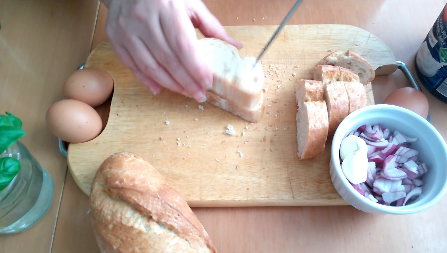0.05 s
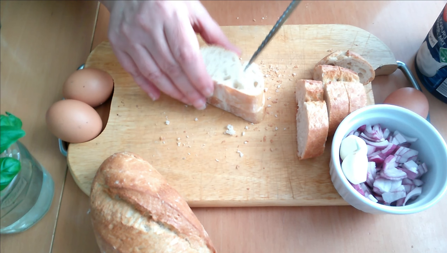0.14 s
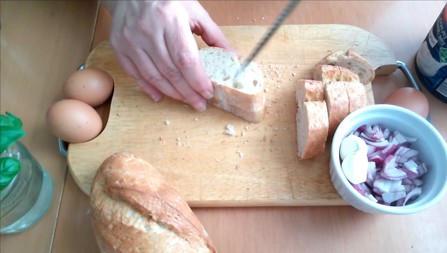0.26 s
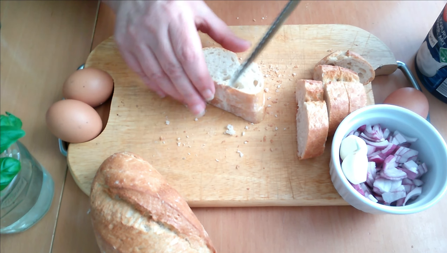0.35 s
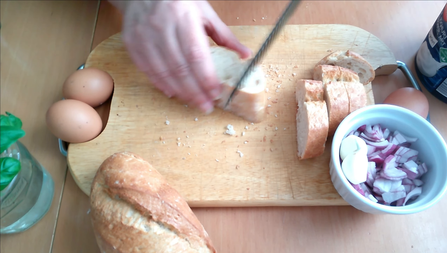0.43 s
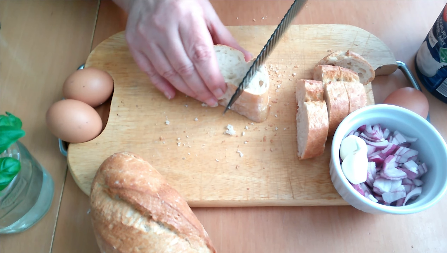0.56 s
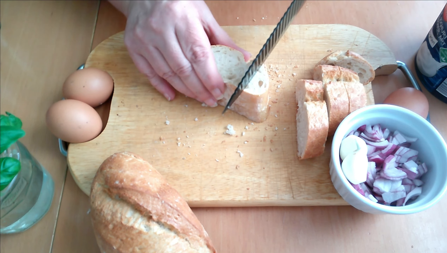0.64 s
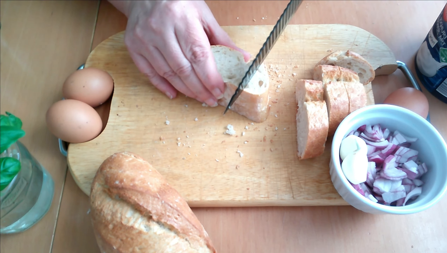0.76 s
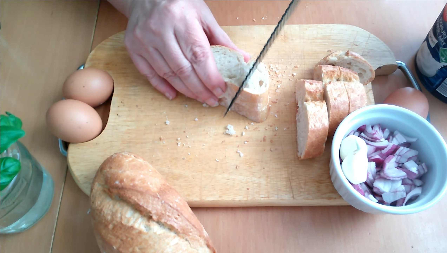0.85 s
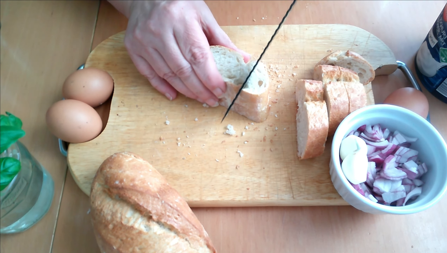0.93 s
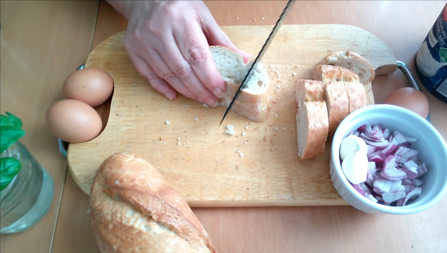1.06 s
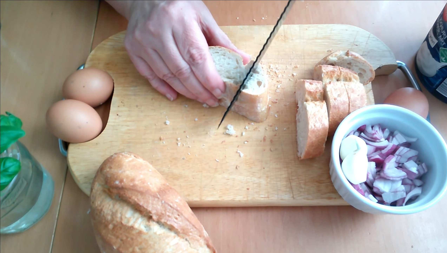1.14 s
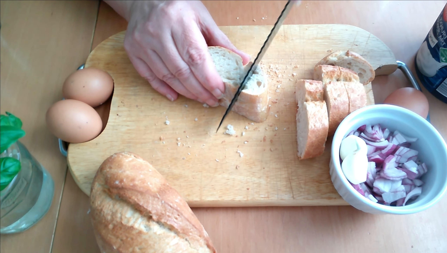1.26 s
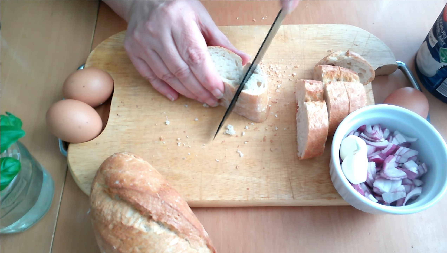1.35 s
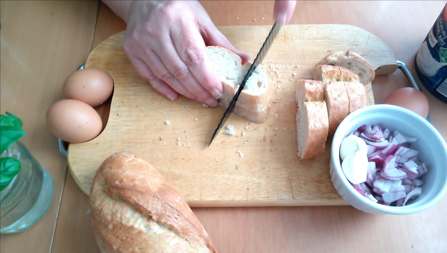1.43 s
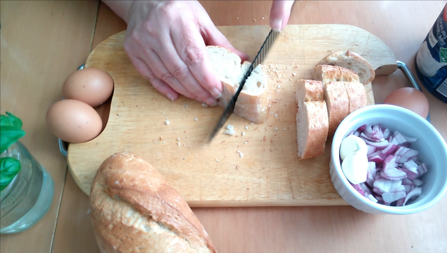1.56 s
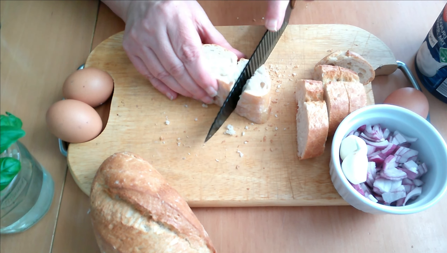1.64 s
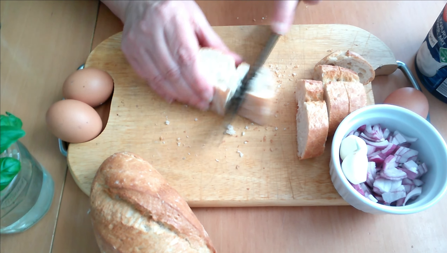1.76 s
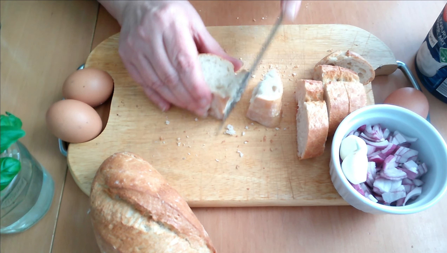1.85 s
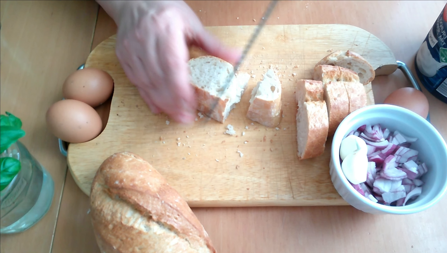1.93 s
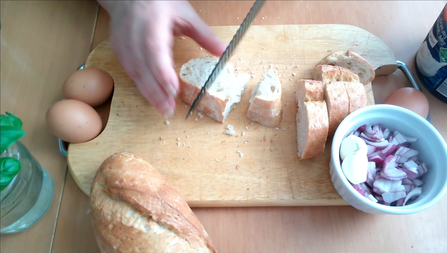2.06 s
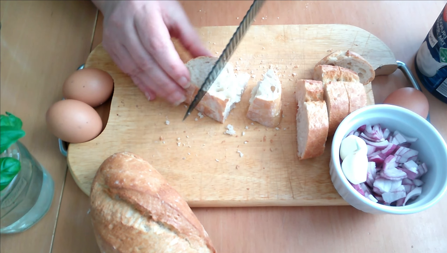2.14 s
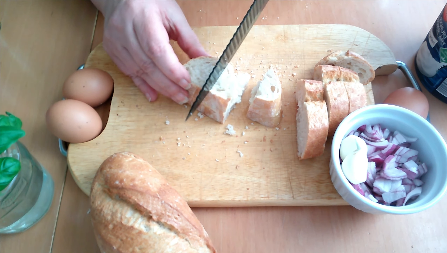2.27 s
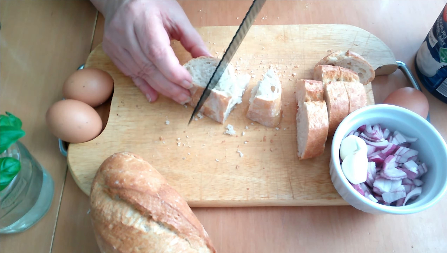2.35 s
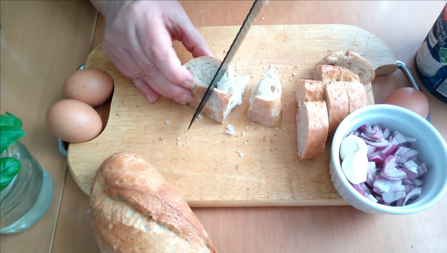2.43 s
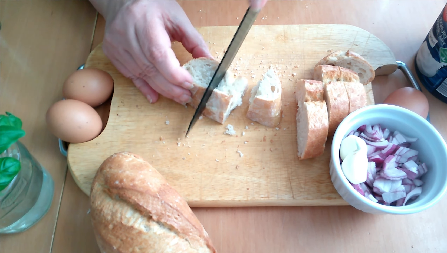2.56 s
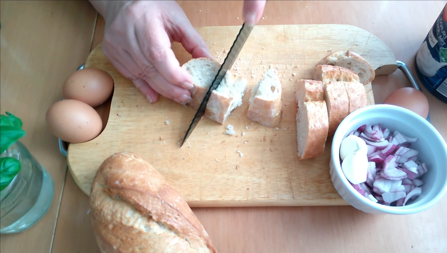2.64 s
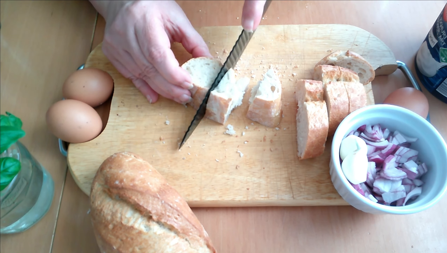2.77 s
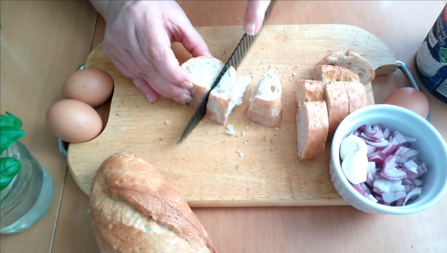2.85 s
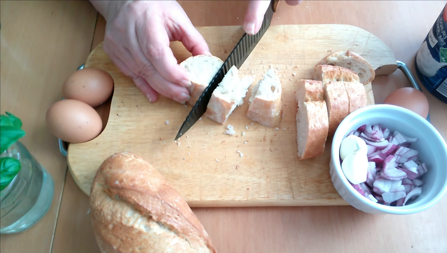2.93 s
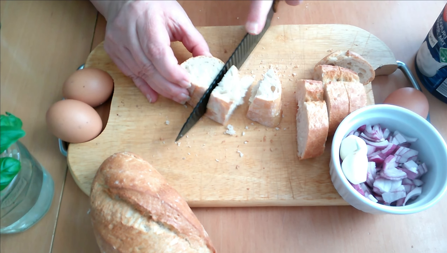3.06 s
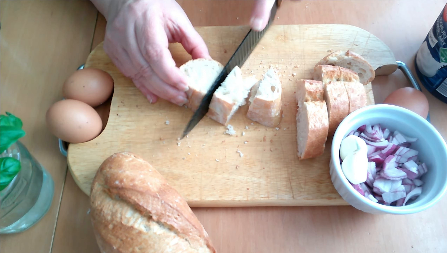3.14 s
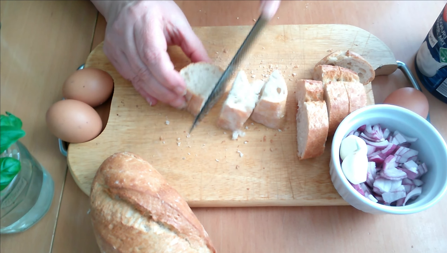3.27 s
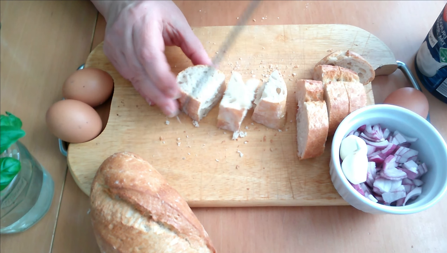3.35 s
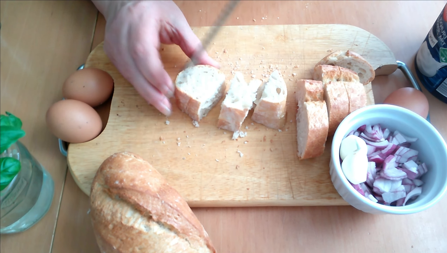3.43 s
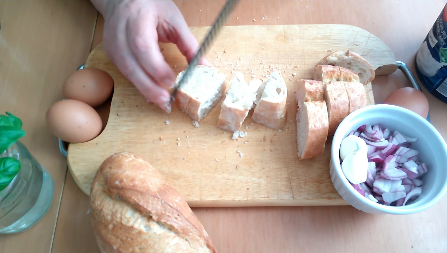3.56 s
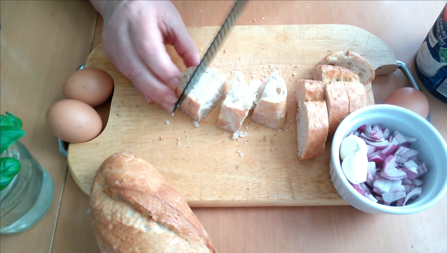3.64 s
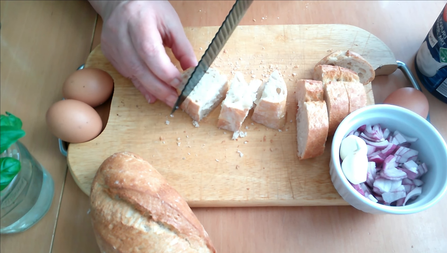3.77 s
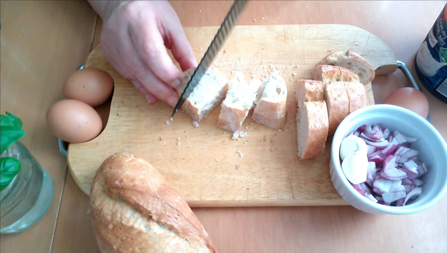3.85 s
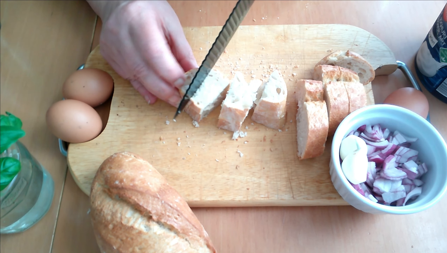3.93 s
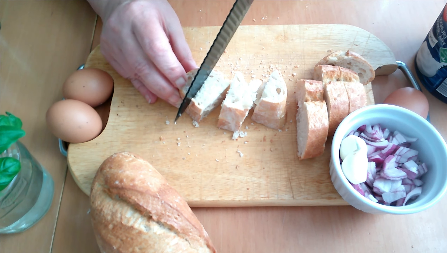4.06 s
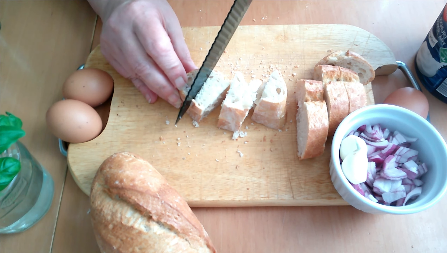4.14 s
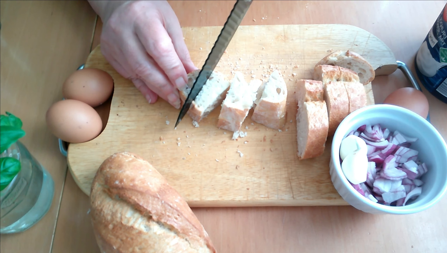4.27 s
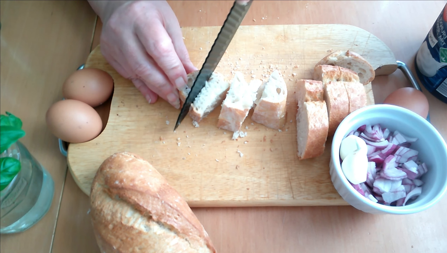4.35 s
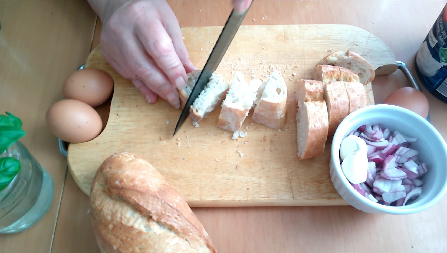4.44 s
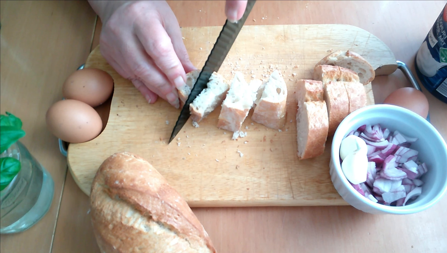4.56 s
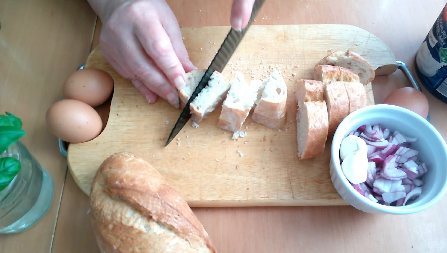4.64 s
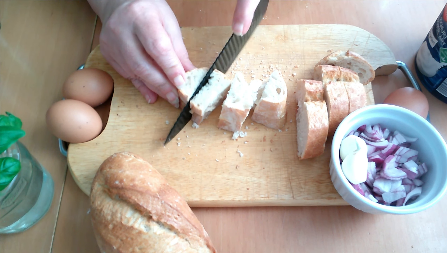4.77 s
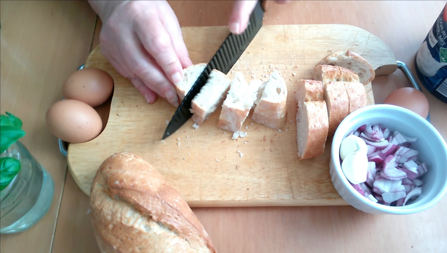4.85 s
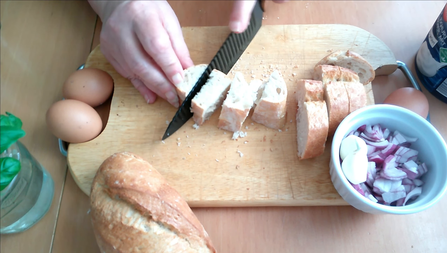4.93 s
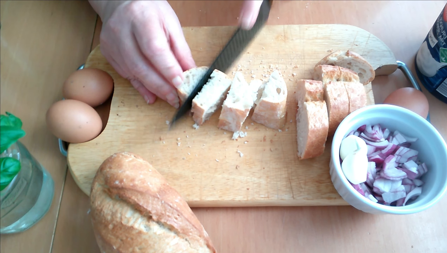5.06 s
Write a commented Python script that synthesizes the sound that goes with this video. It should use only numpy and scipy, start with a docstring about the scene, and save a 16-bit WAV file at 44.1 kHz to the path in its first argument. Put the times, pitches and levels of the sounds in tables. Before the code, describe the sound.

In a home kitchen, a serrated knife saws three slices off a crusty loaf. The teeth rasp and the crust crackles, and the blade knocks hard on the wooden board twice in the first half. After a short lull the sawing picks up again and ends around a lighter double knock. The microphone is close, with a low table rumble under the strokes and a faint room hum.

```python
"""A serrated knife saws three slices off a crusty loaf on a wooden board.
First the kitchen hums, a far engine speeds up until 1.2 s, and the blade taps the board.
From 0.4 s the teeth rasp and crack the crust; hands and saw sway the table in its low modes.
Hard knocks on the board come at 1.4 and 2.6 s; between them the blade sings faintly as it slides out.
After a lull the sawing picks up at 4.2 s and ends around a double knock near 5 s."""
import sys
import numpy as np
from scipy import signal
from scipy.io import wavfile
from scipy.ndimage import uniform_filter1d

SR = 44100
rng = np.random.default_rng(int(sys.argv[2]) if len(sys.argv) > 2 else 0)


def transcribe(signal):
    """Save signal, clipped to [-1, 1], as a 16-bit WAV file at the path in sys.argv[1]."""
    frames = np.atleast_2d(signal).T
    limited = np.clip(frames, -1, 1)
    pcm = np.round(limited * 32767).astype(np.int16)
    wavfile.write(sys.argv[1], SR, pcm)


N = 224818

# room noise spectrum: freq_hz, relative_db
HUM_SPECTRUM = [(40, 5.5), (100, -1.5), (200, -7.5), (300, -10.5), (450, -15.5), (1000, -18.5),
                (2000, -25.5), (3000, -33), (3800, -41.5), (4800, -55.5), (6500, -46.5), (8500, -48),
                (11000, -61.5), (13500, -66), (16000, -79)]
# far engine: time_s, firing_hz, level_db
ENGINE_RUN = [(0, 63.6, -54.5), (.15, 68.67, -58), (.4, 73.5, -54.5), (.6, 81.5, -51), (.8, 85.4, -45),
              (.95, 86.7, -50), (1.2, 88.8, -63)]
# engine orders: firing_multiple, gain_db
ENGINE_ORDERS = [(2, 2.5), (3, -5)]
# table modes: pitch_hz, gain_db, t60_s
TABLE_MODES = [(30, -3, .7), (64, 0, .5), (101, -3, .3), (143, -6, .2), (206, -9, .15), (266, -13, .7)]
# hands rocking the lowest table mode: time_s, level_db
HAND_LEAN = [(0.0, -60), (0.67, -47), (0.81, -51), (0.88, -29), (1.33, -38.5), (1.56, -28), (1.94, -47),
             (2.62, -40), (2.78, -30.5), (2.99, -39), (3.06, -30), (3.27, -53), (3.83, -36), (3.98, -48),
             (4.44, -37), (4.61, -25), (4.88, -29.5), (5.09, -48)]
# saw driving the next two table modes: gain_db, shake_exponent, linger_s
SHAKE_COUPLING = [(-20, 0.53, 0.066), (-10, .75, 0.017)]
# blade on board: start_s, peak_db, centre_hz, tick_peak_db, thump_db
KNOCKS = [(0.0508, -27, 1230, -54, -43), (0.159, -37, 900, -52, -57), (1.3721, 1.5, 1090, -19, -25),
          (2.088, -34.5, 1400, -62, -36.5), (2.5863, 0, 1000, -36, -24.5), (3.614, -22.5, 1410, -52, -34.5),
          (3.874, -44, 994, -58, -46), (4.9577, -12.5, 704, -34, -28.5), (4.9793, -14, 675, -41, -39)]
# board modes: pitch_hz, gain_db, t60_s
BOARD_MODES = [(456, -3.5, 0.052), (667, -6, 0.015), (753.5, -2.5, 0.047), (1069, 8, 0.013),
               (1174, -7, 0.021), (1470, -8, 0.024), (1930, -5.5, 0.045), (2085, -1.5, 0.023),
               (2770, 10, 0.0081), (3900, -4.5, 0.008), (4330, -10.5, 0.005), (6010, -18.5, 0.0053)]
# blade modes: pitch_hz, width_hz, gain_db
BLADE_MODES = [(2100, 180, -13), (2800, 120, -24), (3320, 170, -11), (4500, 50, -34), (6400, 250, -36),
               (12800, 200, -38)]
# treble of snaps and ticks: freq_hz, relative_db
FIZZ_SPECTRUM = [(2650, -37), (4500, -4.5), (6030, -3), (6500, -1.5), (7620, -1), (9430, -7.5),
                 (11100, -22), (12800, -9.5), (14400, -10), (15400, -17.5), (16100, -29.5)]
# body of the crust: freq_hz, relative_db
CRUST_SPECTRUM = [(90, -30.5), (140, 2), (270, -3.5), (320, -15), (420, -6), (600, -6), (1100, -4.5),
                  (1500, -8.5), (2100, -9.5), (2650, -18), (3300, -21.5), (4000, -28), (5000, -43),
                  (7000, -84)]
# saw strokes: start_s, length_s, rasp_start_db, rasp_end_db, treble_rel_db, steel_rel_db, shake_rel_db
STROKES = [(0.412, 0.057, -44, -47, -32, -15, -3.5), (0.746, 0.04, -45, -55.5, -32, -13, 11),
           (0.824, 0.073, -48, -42, -23.5, -35, 15), (.94, 0.27, -41, -53, -25.5, -20, 5.5),
           (1.191, 0.19, -38, -28, -29, -17, 0), (1.403, 0.15, -35.5, -33.5, -25.5, -9.5, -1.5),
           (1.609, 0.066, -46, -47, -24, -14, -1), (1.679, .2, -41, -49.5, -30, -12, -4),
           (2.082, 0.46, -65.5, -41.5, -29, -12, 10), (2.551, 0.092, -28, -40.5, -30.5, -12.5, 2),
           (2.658, 0.21, -35.5, -37.5, -26.5, -9.5, -0.5), (3.015, 0.11, -41.5, -59, -22.5, -11.5, -6.5),
           (3.158, 0.088, -46.5, -46.5, -28.5, -8.5, -11), (3.621, 0.086, -56, -64, -26, -13.5, 14),
           (4.183, 0.13, -56.5, -55, -24.5, -12, -7), (4.337, .16, -42.5, -31, -25, -29, -4),
           (4.519, 0.078, -43, -34.5, -28.5, -18, 8), (4.605, 0.094, -34.5, -34.5, -25.5, -2.5, -3.5),
           (4.707, 0.1, -41, -46.5, -24, -15, 0), (4.827, 0.097, -57, -58, -20, -8, 6),
           (4.948, 0.034, -32, -36.5, -28, -7, 1), (5.018, 0.092, -51, -57, -29, -10, 2)]
# crust cracks: start_s, peak_db, centre_hz, treble_peak_db
CRACKS = [(0.464, -28.5, 1740, -67), (.824, -26, 1660, -43), (0.836, -25.5, 665, -51),
          (.846, -12, 627, -38.5), (.851, -21, 1900, -38), (.856, -26, 590, -49), (0.885, -26, 754, -44),
          (.924, -27.5, 760, -64), (0.951, -41, 1290, -50), (.965, -25, 730, -60),
          (.989, -24.5, 915, -43.5), (1.061, -34, 690, -66), (1.127, -34, 970, -66), (1.194, -25, 760, -49),
          (1.227, -31, 764, -54), (1.254, -25, 700, -50), (1.27, -26, 2010, -42), (1.282, -30, 1500, -48),
          (1.304, -37, 1070, -54), (1.336, -18.5, 1060, -37.5), (1.346, -20, 706, -42),
          (1.395, -20, 1170, -40), (1.549, -18, 1100, -40), (1.58, -18, 1160, -37),
          (1.686, -29, 2010, -55.5), (2.169, -38, 1670, -76.5), (2.361, -35.5, 1480, -63),
          (2.477, -19, 976, -40.5), (2.564, -20, 1070, -52), (2.624, -21, 993, -64),
          (2.67, -22.5, 1470, -38.5), (2.695, -23, 1380, -43), (2.717, -21.5, 1500, -41),
          (2.757, -19, 1120, -45), (2.77, -19, 1300, -42), (2.844, -11.5, 1480, -36),
          (2.85, -15.5, 1860, -40), (2.859, -18, 1480, -38), (2.883, -30, 1410, -51),
          (3.024, -30, 1555, -48), (3.112, -42.5, 2530, -54), (4.36, -26.5, 1540, -47.5),
          (4.387, -23.5, 1250, -46), (4.44, -20, 1200, -43), (4.486, -18.5, 1640, -48),
          (4.499, -19.5, 1030, -58), (4.536, -29, 1410, -61), (4.589, -24, 1190, -44),
          (4.615, -15, 1500, -36.5), (4.63, -22.5, 1100, -50), (4.647, -19, 982, -57),
          (4.674, -17, 1090, -36), (4.697, -17, 1430, -48), (4.718, -25, 1090, -62),
          (4.747, -22.5, 1070, -62), (4.776, -25.5, 1690, -53), (4.793, -21.5, 1140, -60),
          (4.862, -32, 2950, -54), (4.929, -36, 2900, -68)]
# blade sliding out: time_s, level_db
SLIDE_LEVELS = [(1.55, -66), (1.7, -50.5), (1.95, -56), (2.25, -71)]
# sliding blade modes: pitch_hz, width_hz, gain_db
SLIDE_MODES = [(2820, 130, -5), (13300, 500, -36)]

HUM_DB, REVERB_DB, CUTOFF_HZ = -46.5, -19.5, 16200
DAMP_CYCLES, FREE_SHARE = 4.43, 0.26  # the resting blade stops all but a free share of each board mode
BITE_S, LIFT_S = 0.013, 0.018  # stroke attack, release
CRACK_CYCLES = 3.75  # crack decay, in periods of its pitch


def amp(db):
    """dB to gain."""
    return 10 ** (np.asarray(db) / 20)


def unit_rms(x):
    """Scales to rms 1."""
    return x / np.sqrt(np.mean(x ** 2) + 1e-20)


def curves(rows):
    """Table columns at every sample."""
    times_s, *columns = np.transpose(rows)
    return [np.interp(np.arange(N) / SR, times_s, column) for column in columns]


def add(mix, start_s, sound):
    """Mixes a sound in at start_s."""
    part = mix[round(start_s * SR):][:len(sound)]
    part += sound[:len(part)]


def colour(x, spectrum):
    """Minimum-phase filter of unit energy, shaped to the spectrum."""
    freq_hz, db = np.transpose(spectrum)
    bins_hz = abs(np.fft.fftfreq(8192, 1 / SR))
    bins_db = np.interp(np.log(bins_hz + 1), np.log(freq_hz), np.maximum(db, -100))
    response = np.exp(np.conj(signal.hilbert(np.log(amp(bins_db)))))
    taps = np.fft.ifft(response).real[:4096]
    return signal.oaconvolve(x, taps / np.linalg.norm(taps))[:len(x)]


def resonate(x, hz, width_hz):
    """Resonance of gain 1 at hz."""
    carrier = np.exp(2j * np.pi * np.cumsum(hz * np.ones(len(x))) / SR)
    pole = np.exp(-np.pi * width_hz / SR)
    return 2 * (carrier * signal.lfilter([1 - pole], [1, -pole], x / carrier)).real


def excite(x, modes):
    """x through a set of steep resonances."""
    return sum(amp(db) * resonate(resonate(x, hz, width_hz), hz, 2 * width_hz)
               * np.sqrt(SR / width_hz / 2 / np.pi) for hz, width_hz, db in modes)


def drift(rate_hz):
    """Smooth random drift, rms 1."""
    width = max(int(SR / rate_hz), 2)
    return unit_rms(uniform_filter1d(uniform_filter1d(rng.standard_normal(N), width), width))


def snaps(shape, per_s, spread_db):
    """Random clicks of either sign, a few much larger."""
    size = amp(spread_db * np.minimum(rng.exponential(1, shape), 4))
    return unit_rms(size * rng.standard_normal(shape) * (rng.random(shape) < per_s / SR))


def ring(modes, length_s):
    """Sum of decaying modes."""
    t = np.arange(int(length_s * SR)) / SR
    return sum(amp(db - 60 * t / t60_s) * np.sin(2 * np.pi * hz * t) for hz, db, t60_s in modes)


def kitchen_hum():
    """Room noise, wavering slightly in level."""
    return amp(HUM_DB + drift(rate_hz=22)) * colour(rng.standard_normal(N), HUM_SPECTRUM)


def far_engine():
    """Two low orders of a rising firing rate."""
    firing_hz, level_db = curves(ENGINE_RUN)
    phase = 2 * np.pi * np.cumsum(firing_hz) / SR
    audible = np.arange(N) / SR < ENGINE_RUN[-1][0]
    return audible * sum(amp(level_db + gain_db + 2.5 * drift(rate_hz=36)) * np.sin(order * phase)
                         for order, gain_db in ENGINE_ORDERS)


def table_sway(shake):
    """Hands and saw drive the three lowest table modes: wavering tones with a lumpy edge."""
    out, gains = np.zeros(N), [amp(curves(HAND_LEAN)[0])]
    for gain_db, exponent, linger_s in SHAKE_COUPLING:
        pole = np.exp(-1 / (SR * linger_s))
        lingering = abs(signal.lfilter([1 - pole], [1, -pole], shake))
        gains.append(amp(gain_db) * lingering ** exponent)
    for gain, (hz, _, _), roughness in zip(gains, TABLE_MODES, (.25, .5, .8)):
        pitch_hz = hz * (1 + 0.071 * drift(rate_hz=6.6))
        tone = np.sqrt(2) * np.sin(2 * np.pi * np.cumsum(pitch_hz) / SR)
        lumps = unit_rms(resonate(resonate(rng.standard_normal(N), hz, .5 * hz), hz, .5 * hz))
        out += gain * (tone + roughness * lumps) / np.sqrt(1 + roughness ** 2)
    return out


def board_knocks():
    """The blade rings the struck spot's modes, then damps them; the steel ticks, the table thumps."""
    out, t = np.zeros(N), np.arange(3000) / SR
    thump = ring(TABLE_MODES, length_s=.9)
    attack = (1 - np.exp(-t / .0006)) ** 2
    ticks = rng.standard_normal((len(KNOCKS), len(t))) * np.exp(-t / .0015)
    for (start_s, peak_db, centre_hz, tick_db, thump_db), tick in zip(KNOCKS, ticks):
        wood = np.zeros(len(t))
        for hz, gain_db, t60_s in BOARD_MODES:
            struck_db = gain_db - 10 * np.log2(hz / centre_hz) ** 2
            damping = FREE_SHARE + np.exp(-(t * hz / DAMP_CYCLES) ** 2)
            wood += attack * damping * ring([(hz, struck_db, t60_s)], length_s=.08)[:len(t)]
        steel = excite(tick, BLADE_MODES) + 0.04 * colour(tick, FIZZ_SPECTRUM)
        add(out, start_s, amp(tick_db) * steel / abs(steel).max() - amp(peak_db) * wood / abs(wood).max())
        add(out, start_s, amp(thump_db) * thump)
    return out


def kitchen_reverb(x, low_t60_s=0.21, high_t60_s=0.05):
    """Sparse reflections of random sign; treble dies first."""
    t = np.arange(SR // 2) / SR
    taps = rng.choice([-1., 1.], len(t)) * (rng.random(len(t)) < 2000 / SR) * (t > .004)
    low = signal.lfilter([.25], [1, -.75], taps)
    tail = low * amp(-60 * t / low_t60_s) + 0.19 * (taps - low) * amp(-60 * t / high_t60_s)
    return signal.oaconvolve(x, tail / np.linalg.norm(tail))[:N]


def saw_strokes():
    """Gains of body, treble, steel and table shake: each stroke bites fast and dies as the blade stops."""
    t, gains = np.arange(N) / SR, np.zeros((4, N))
    for start_s, length_s, start_db, end_db, *relative_db in STROKES:
        age_s = t - start_s
        gate = np.clip(age_s / BITE_S, 0, 1) * np.exp(-np.maximum(age_s - length_s, 0) / LIFT_S)
        rasp_db = np.interp(age_s, [0, length_s], [start_db, end_db])
        gains += amp([0, *relative_db])[:, None] * (gate * amp(rasp_db))
    return gains


def teeth_rasp(body_gain, treble_gain, steel_gain):
    """Teeth tear the crumb: clumped small snaps over friction hiss, which also ring the steel."""
    clumps, hiss = amp(2.47 * drift(rate_hz=80)), rng.standard_normal(N)
    crackle = snaps(N, per_s=1300, spread_db=3.6)
    teeth = unit_rms(clumps * (crackle + 0.62 * hiss))
    crumbs = unit_rms(clumps ** 1.4 * (crackle + 0.51 * hiss))  # grainier, for the treble
    return (body_gain * colour(teeth, CRUST_SPECTRUM) + treble_gain * colour(crumbs, FIZZ_SPECTRUM)
            + excite(steel_gain * teeth, BLADE_MODES))


def crust_cracks(steel_share):
    """Each crack is a quick volley of snaps that rings the hollow crust and the blade."""
    out, t = np.zeros(N), np.arange(2048) / SR
    volleys = snaps((len(CRACKS), len(t)), per_s=7000, spread_db=3.8)
    volleys[:, 24] += 11 * np.sign(volleys.sum(axis=1))  # the first break is the clearest
    for (start_s, peak_db, hz, treble_db), volley in zip(CRACKS, volleys):
        age = t * hz / CRACK_CYCLES
        burst = volley * (1 - np.exp(-age / 0.14)) * np.exp(-age ** 0.94)
        crust = colour(resonate(burst, hz, 0.067 * hz) + .5 * burst, CRUST_SPECTRUM)
        body = crust + steel_share[round(start_s * SR)] * excite(burst, BLADE_MODES)
        fizz = colour(burst, FIZZ_SPECTRUM)
        add(out, start_s, amp(peak_db) * body / abs(body).max())
        add(out, start_s, amp(treble_db) * fizz / abs(fizz).max())
    return out


def blade_slide():
    """Friction sings faintly in two blade modes as the knife slides out."""
    t = np.arange(N) / SR
    touching = (t > SLIDE_LEVELS[0][0]) & (t < SLIDE_LEVELS[-1][0])
    return touching * amp(curves(SLIDE_LEVELS)[0]) * excite(rng.standard_normal(N), SLIDE_MODES)


def scene():
    """Knife sounds with reverb, plus table, engine and hum; mono."""
    body_gain, treble_gain, steel_gain, shake = saw_strokes()
    steel_share = steel_gain / (body_gain + 1e-9)
    knife = teeth_rasp(body_gain, treble_gain, steel_gain) + crust_cracks(steel_share)
    knife += board_knocks() + blade_slide()
    reverb = amp(REVERB_DB) * kitchen_reverb(knife)
    return (knife + reverb + table_sway(shake) + far_engine() + kitchen_hum())[None]


def record(dry):
    """Clips the loudest knocks at full scale, then low-passes."""
    lowpass = signal.firwin(511, CUTOFF_HZ, window=("kaiser", 9), fs=SR)
    return signal.oaconvolve(np.clip(dry, -1, 1), lowpass[None], "same")


dry = scene()
out = record(dry)
transcribe(out)
```